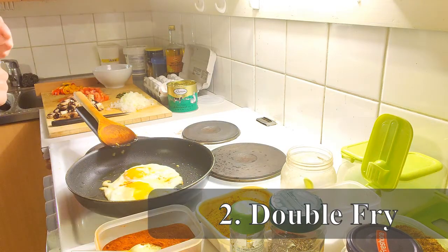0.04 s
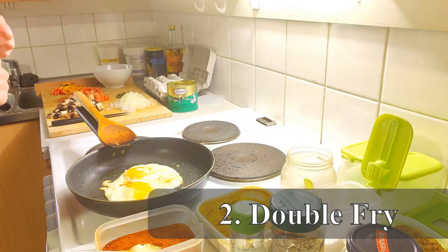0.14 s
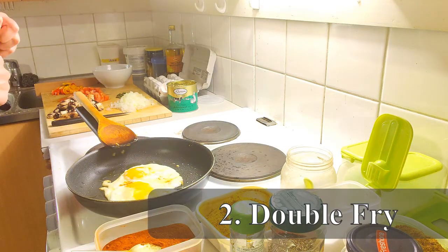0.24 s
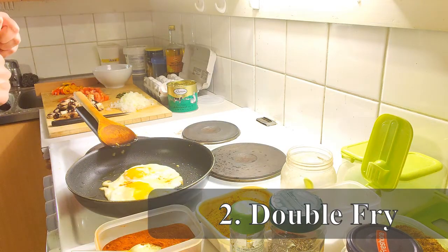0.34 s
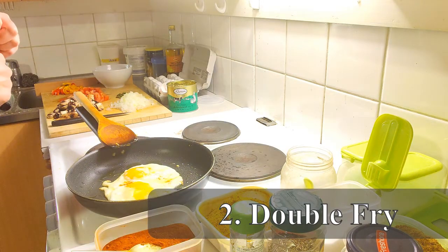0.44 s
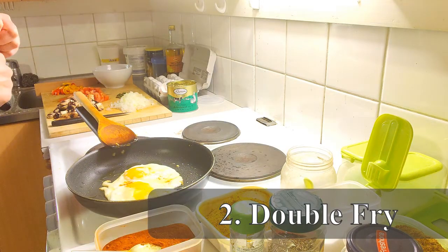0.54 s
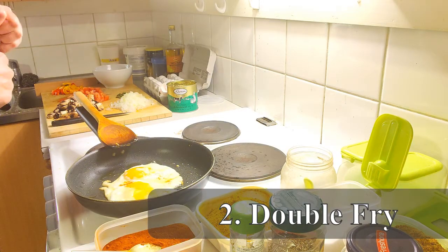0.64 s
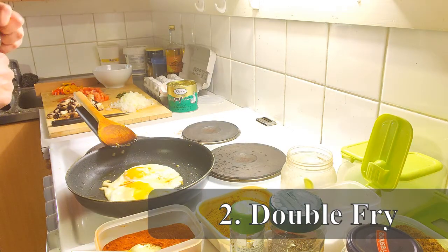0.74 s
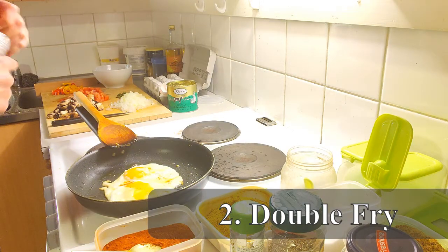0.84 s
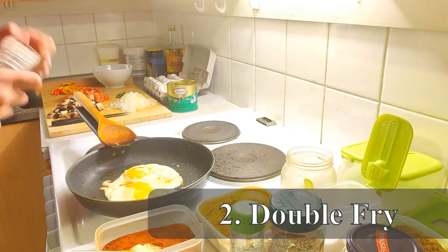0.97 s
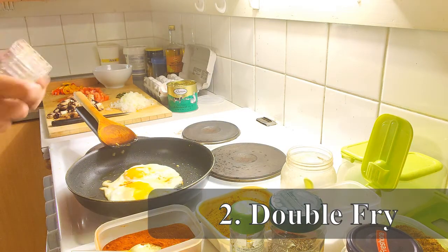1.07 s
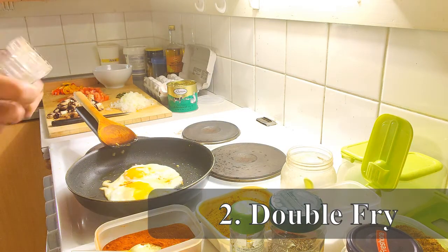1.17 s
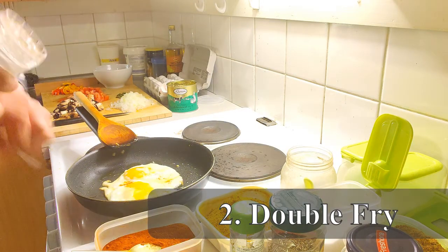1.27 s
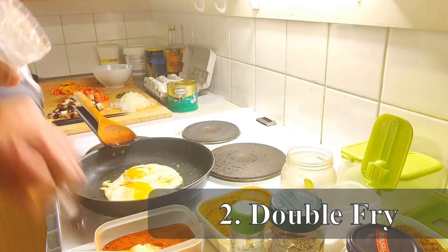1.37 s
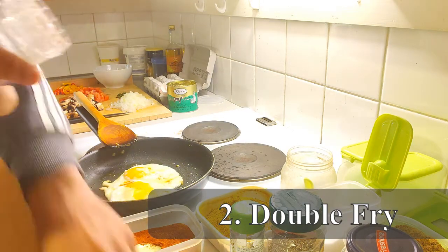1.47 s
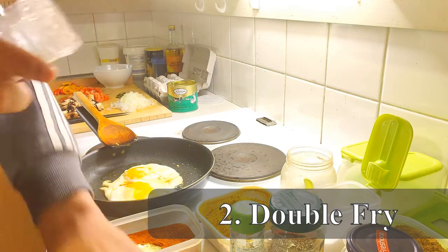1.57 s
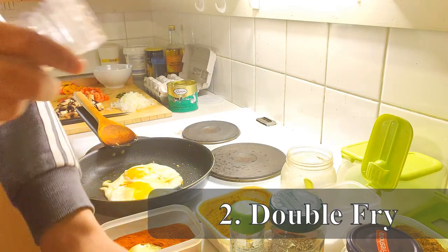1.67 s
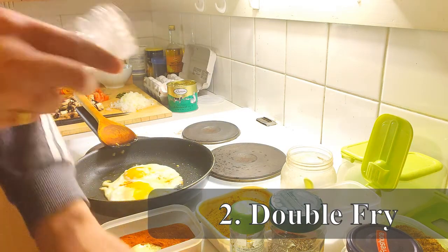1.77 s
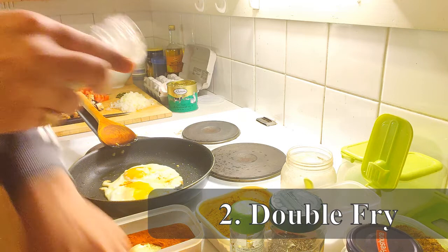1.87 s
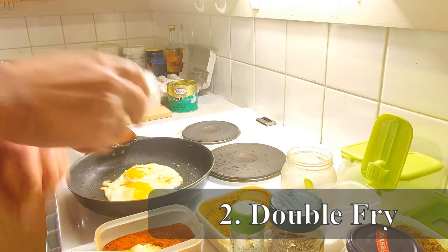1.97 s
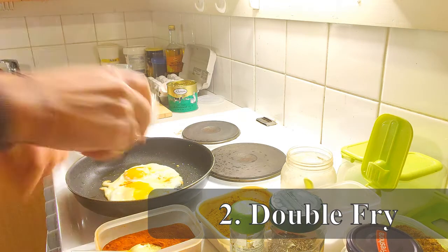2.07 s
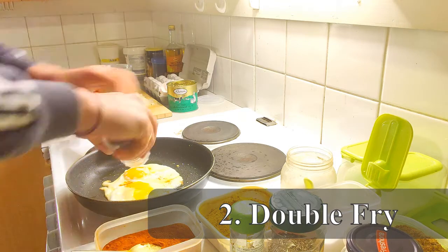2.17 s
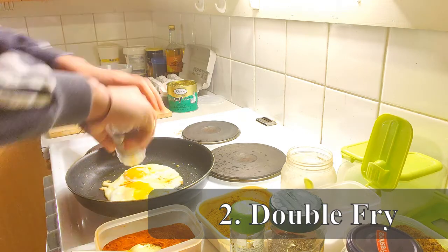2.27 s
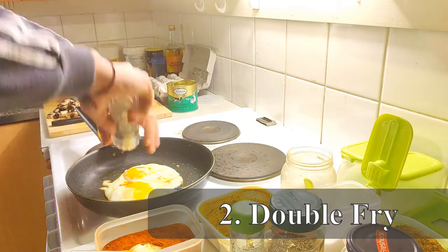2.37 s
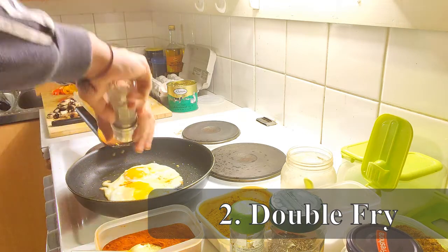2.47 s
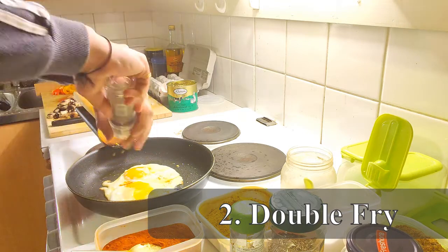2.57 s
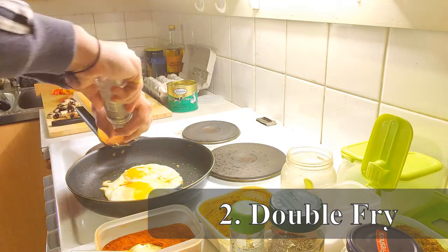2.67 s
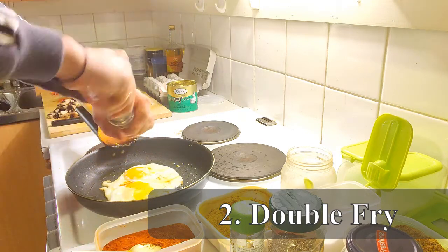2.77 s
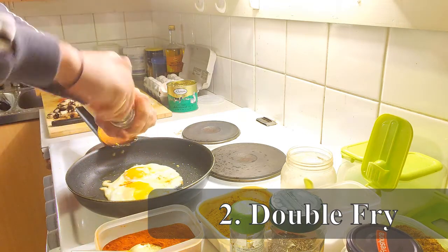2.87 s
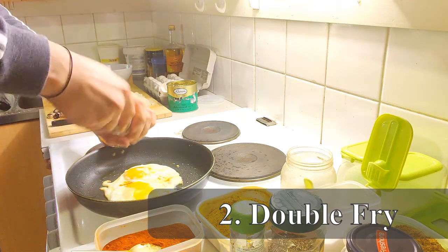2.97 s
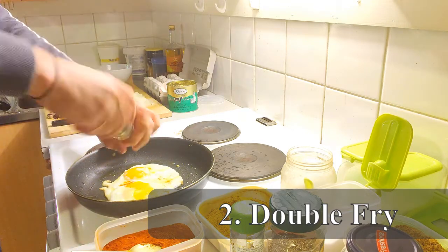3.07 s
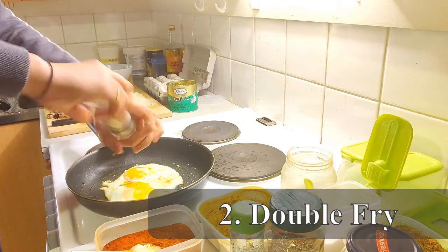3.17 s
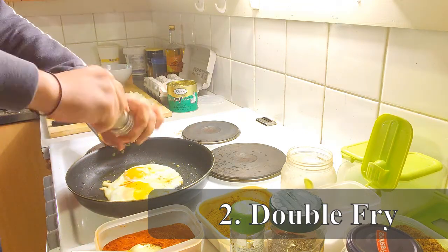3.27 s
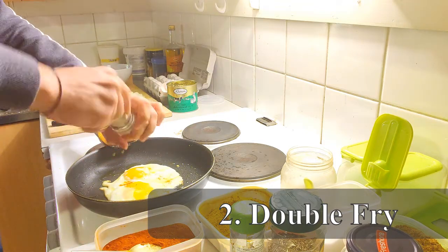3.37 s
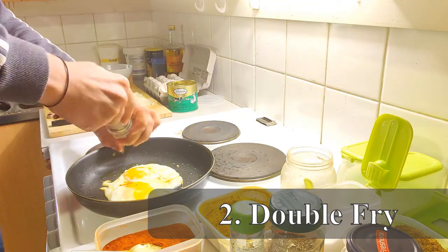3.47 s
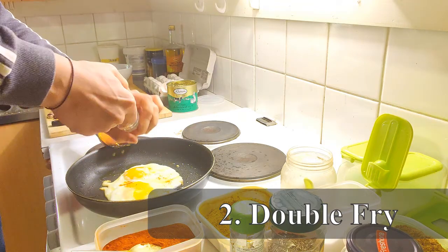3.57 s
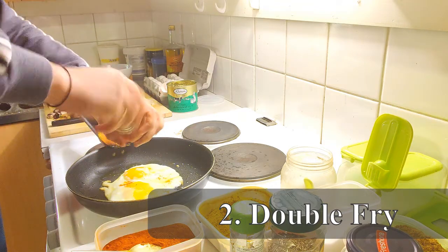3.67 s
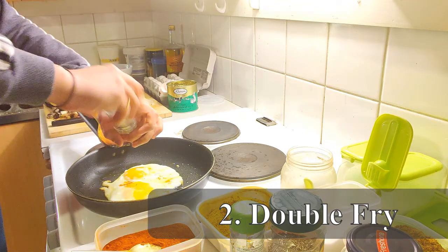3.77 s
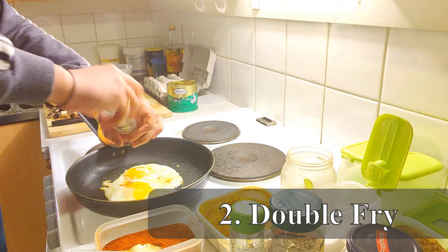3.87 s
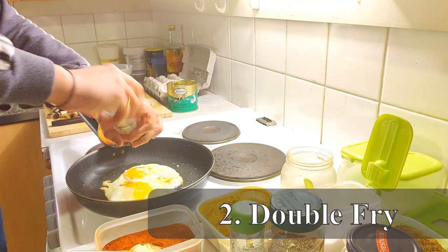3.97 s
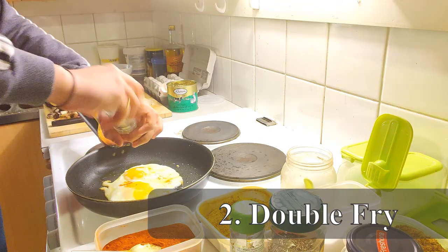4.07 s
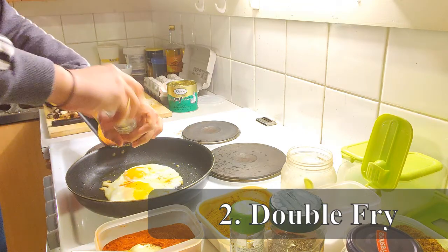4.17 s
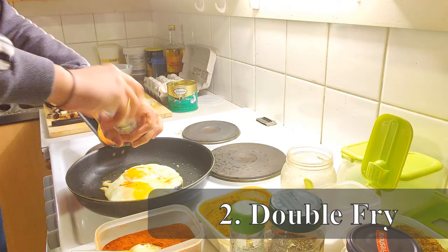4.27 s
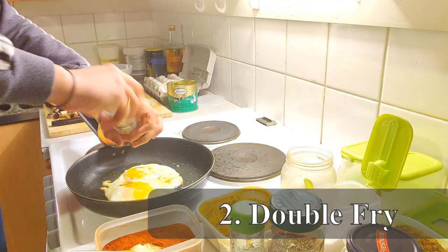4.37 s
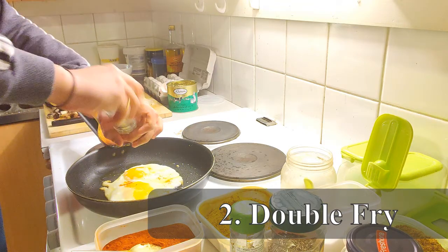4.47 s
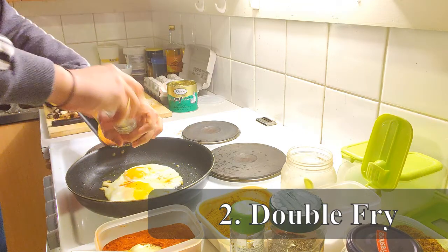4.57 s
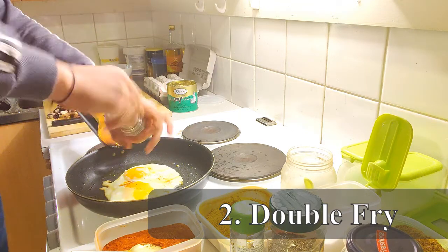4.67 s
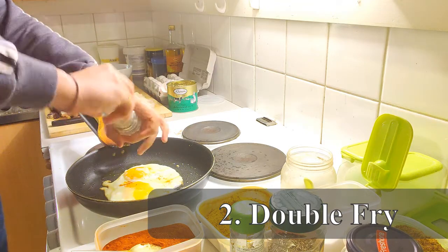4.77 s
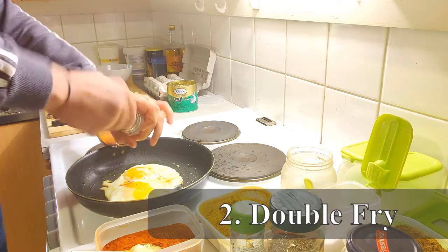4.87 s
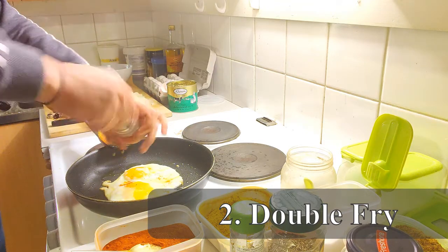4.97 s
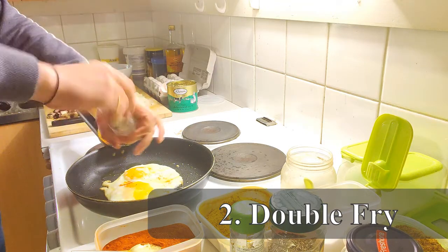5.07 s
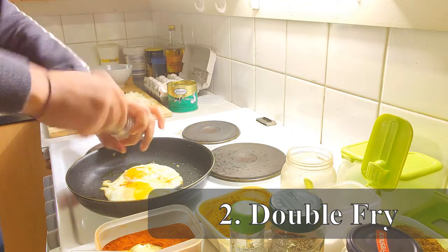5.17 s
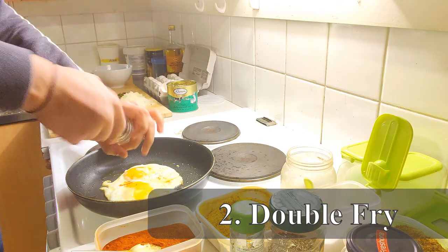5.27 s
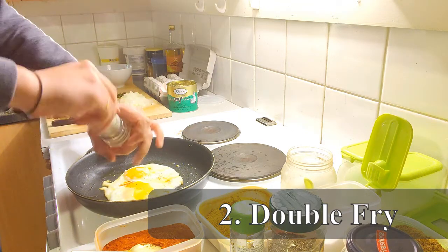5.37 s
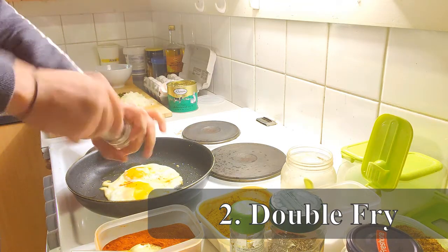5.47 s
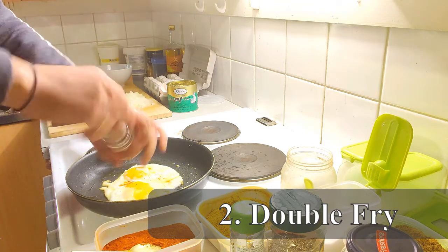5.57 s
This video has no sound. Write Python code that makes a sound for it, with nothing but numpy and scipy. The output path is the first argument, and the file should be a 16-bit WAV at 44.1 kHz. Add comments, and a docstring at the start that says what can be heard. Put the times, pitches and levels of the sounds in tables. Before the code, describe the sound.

Close stereo pickup beside a hob in a small, hard tiled kitchen. Faint frying hiss and low rumble run underneath. A cupboard door bumps lightly, then shuts with a hollow wooden boom and rattling catch. A plastic cap clicks off and scrapes, a hand rubs into its grip, and a pepper mill is twisted in short, crunchy bursts until the end, with quick room echoes.

```python
"""A low hum and a faint frying hiss fill a tiled kitchen while a cupboard door bumps, booms and rattles.
A plastic cap is pulled off a pepper mill and the mill is twisted over a pan, where an egg plops dully.
In each twist peppercorns snap and crumble between the burrs and ring the mill's small housing.
Blows are shaped noise plus fading tones, hiss and rumble are filtered noise, the hum is a sine wave.
The room answers every click with quick echoes and a fading tail."""
import sys
import numpy as np
from scipy import signal
from scipy.fft import rfft, irfft, next_fast_len
from scipy.io import wavfile
from scipy.ndimage import map_coordinates

SR = 44100
rng = np.random.default_rng(int(sys.argv[2]) if len(sys.argv) > 2 else 0)


def persist_wave(psi):
    """Save psi, clipped to +-1, as 16-bit WAV."""
    counts = np.round(np.clip(psi, -1, 1) * 32767).astype(np.int16)
    wavfile.write(sys.argv[1], SR, np.atleast_2d(counts).T)


N = 248634  # length in samples

# Tone colour of corn cracking in the burrs and housing. Each row: frequency in Hz, gain in dB.
MILL_COLOUR = [(120, -41), (270, -20), (450, -20.5), (860, -13), (1200, -17), (1700, -6), (2600, -9.5),
               (4200, -12.5), (5300, -10.5), (6900, -0.5), (8200, -12.5), (10200, -11), (12000, -14.5),
               (14200, -4.5), (16000, -9.5)]


def amp(db):
    """Turn decibels into gain."""
    return 10 ** (np.asarray(db) / 20)


def unit(x):
    """Scale a steady sound to an rms of 1."""
    return x / np.sqrt(np.mean(x ** 2) + 1e-20)


def pulse(x):
    """Scale a short sound to the energy of one millisecond at rms 1."""
    return x / np.sqrt(np.sum(x ** 2) * 1000 / SR + 1e-20)


def along(points, hz):
    """Read a curve of (Hz, value) points, with frequency on a log axis."""
    f, v = np.transpose(points)
    return np.interp(np.log(hz + 1), np.log(f + 1), v)


def ages():
    """Count the seconds that pass after a blow, for a third of a second."""
    return np.arange(SR // 3) / SR


def coloured(x, points):
    """Filter with the gains of (Hz, dB) points; like a real object, it only responds after the input."""
    m = next_fast_len(x.shape[-1] + 2048, True)
    gain_db = along(points, np.fft.rfftfreq(m, 1 / SR))
    # folding the cepstrum (the transform of the log gain) puts the response after each blow
    cepstrum = irfft(np.log(amp(gain_db)), m)
    cepstrum[1:m // 2] *= 2
    cepstrum[m // 2 + 1:] = 0
    response = np.exp(rfft(cepstrum))
    return irfft(rfft(x, m) * response, m)[..., :x.shape[-1]]


def diffuse(size):
    """Stereo noise whose left-right likeness is set per frequency: wide in the middle, mono in the top treble."""
    # Each row: frequency in Hz, left-right likeness (1 is identical).
    likeness = [(60, 1), (130, 0.95), (290, 0.63), (640, 0.79), (1410, 0.13), (3100, 0.2), (6800, 0.53),
                (10000, 1), (15000, 1)]
    turn = np.arccos(np.clip(along(likeness, np.fft.rfftfreq(size, 1 / SR)), -1, 1)) / 2
    spectra = rfft(rng.standard_normal((2, size)))
    mid, side = irfft(spectra * [np.cos(turn), np.sin(turn)], size)
    return np.array([mid + side, mid - side])


def burst(rise, t60):
    """A contact made of many tiny slips: noise swells for rise s, then falls 60 dB in t60 s."""
    t = ages()
    swell = np.minimum(t / rise, 1) ** 2
    fade = amp(-60 * np.maximum(t - rise, 0) / t60)
    return pulse(rng.standard_normal(len(t)) * swell * fade)


def ring(modes, scatter_db):
    """A struck object's own tones die away, each started at a new strength every time."""
    t = ages()
    total = np.zeros(len(t))
    for hz, db, t60 in modes:
        fade = amp(db + scatter_db * rng.normal() - 60 * t / t60)
        total += fade * np.sin(2 * np.pi * hz * t) * rng.choice([-1, 1])
    return pulse(total)


def in_kitchen(x, near_db, far_db, pan_db=0, lag_spread_s=.000013):
    """Direct sound, quick echoes from hob and tiles, and the tail of the room."""
    # How long the tail lasts. Each row: frequency in Hz, time to fall 60 dB in seconds.
    tail_times = [(130, 0.23), (340, 0.55), (600, 0.57), (1400, 0.48), (3700, 0.35), (7000, 0.27),
                  (14000, 0.2)]
    # Left-right phase offset of the direct sound; a whole turn means in phase.
    # Each row: frequency in Hz, offset in radians.
    phase_offset = [(60, -1), (800, 1.01), (1500, 2), (2400, 3.5), (4700, 2 * np.pi), (16000, 2 * np.pi)]
    size = SR // 2
    hz, age, z = signal.stft(diffuse(size=size), SR, nperseg=256)
    fade = amp(-60 * age / along(tail_times, hz)[:, None])
    tail = signal.istft(z * fade, SR, nperseg=256)[1][:, :size]
    t = np.arange(size) / SR
    near = diffuse(size=size) * amp(-60 * t / 0.047) * (t > .003)
    far = tail * (1 - np.exp(-t / 0.0022))
    echoes = amp(near_db) * near / np.linalg.norm(near[0]) + amp(far_db) * far / np.linalg.norm(far[0])
    hz = np.fft.rfftfreq(size, 1 / SR)
    delay = 2 * np.pi * hz * .0004  # 0.4 ms on both sides
    # each sound gets its own small random left-right lag, which widens the treble
    offset = along(phase_offset, hz) + 2 * np.pi * hz * lag_spread_s * rng.normal()
    direct = irfft(np.exp(-1j * np.array([delay, delay + offset])), size) * (t < .05)
    balance = unit(amp([[pan_db / 2], [-pan_db / 2]]))  # positive leans left
    return signal.fftconvolve(x[None], balance * direct + echoes, axes=1)


def add(track, s, sound):
    """Mix a sound into the track at time s, in seconds."""
    room_left = track[:, max(round(s * SR), 0):][:, :sound.shape[1]]
    room_left += sound[:, :room_left.shape[1]]


def background():
    """A faint, flickering frying hiss over low rumble and hum: filtered noise and one 70 Hz sine."""
    # Tone colour of the frying and room hiss. Each row: frequency in Hz, gain in dB.
    air = [(150, -34), (250, -7.5), (429, -3), (607, 0.5), (710, -6.5), (802, 2.5), (1280, -5.5),
           (1450, -8), (2960, -12), (3650, -10.5), (7060, -5), (8700, -14.5), (12200, -12.5), (13800, -3),
           (16000, -5)]
    # Tone colour of the room rumble. Each row: frequency in Hz, gain in dB.
    rumble_colour = [(12, -27), (20, -12), (58, -2.5), (86, 1.5), (108, -2.5), (239, -25), (260, -18),
                     (340, -50.5), (570, -120)]
    # Loudness of the rumble over time. Each row: time in seconds, level in dB.
    drone = [(0, -72), (.24, -72), (.34, -55.5), (5.6, -58)]
    t = np.arange(N) / SR
    flutter = map_coordinates(rng.standard_normal(N // 1000 + 4), [t * 25])  # 25 random points a second
    hiss = unit(coloured(diffuse(size=N), air)) * amp(-54.5 + 1.46 * flutter)
    hum = amp(-14.0) * np.sin(2 * np.pi * 70 * t)
    rumble = unit(coloured(diffuse(size=N), rumble_colour)) + hum
    return hiss + rumble * amp(np.interp(t, *np.transpose(drone)))


def cupboard():
    """Bumps shove the wooden door and set it booming while its hinge and catch rattle."""
    # Wooden bumps. Each row: start in seconds, relative level in dB.
    thuds = [(0.014, -45.5), (0.046, -49), (0.095, -42.5), (0.12, -49.5), (0.533, -31.5), (0.553, -47),
             (0.6645, -14.5), (0.686, -22)]
    # Tones of the door. Each row: frequency in Hz, relative level in dB, time to fall 60 dB in seconds.
    door = [(127, -3, 0.045), (177, -7, 0.17), (275.3, -1, 0.27), (316, -15, 0.27), (354.7, -1, 0.17),
            (498, -14, 0.19), (1690, -26, .2), (2070, -25, 0.29)]
    # Tone colour of the wood. Each row: frequency in Hz, gain in dB.
    wood = [(25, -46), (45, -33), (95, -0.5), (150, 3.5), (220, -4.5), (330, 5), (520, -5.5), (800, -12),
            (1500, -32), (4000, -52), (12000, -77)]
    # Hinge and catch. Each row: start in seconds, relative level in dB, brightness in dB.
    rattles = [(0.0187, -35.5, 0.5), (0.099, -37, 2.5), (0.2053, -38.5, 3), (0.382, -26, 5.5),
               (0.4919, -35.5, -16), (0.5152, -41.5, -3), (0.5341, -34, -11), (0.6641, -21, 4),
               (0.6945, -20.5, 8), (0.7024, -34, 8)]
    # Tone colour of hinge and catch. Each row: frequency in Hz, gain in dB.
    catch = [(300, 2), (1000, -2), (2100, 6), (3000, 6.5), (3700, 0.5), (5400, 0.5), (6300, -2.5),
             (7500, -0.5), (10000, -14), (16000, -10.5)]
    out = np.zeros((2, N))
    shove = pulse(coloured(signal.unit_impulse(len(ages())), wood))
    for s, db in thuds:
        judder = pulse(coloured(burst(rise=.002, t60=.035), wood))
        boom = ring(door, scatter_db=1.5)
        thud = shove + amp(-7.5) * judder + amp(1.5) * boom
        add(out, s, amp(db + 4.5) * in_kitchen(pulse(thud), near_db=-9.0, far_db=-9))
    for s, db, bright_db in rattles:
        contact = coloured(burst(rise=0.00085, t60=0.016), catch)
        tick = pulse(coloured(contact, [(2500, 0), (9000, bright_db)]))
        add(out, s, amp(db - 1.5) * in_kitchen(tick, near_db=-4.0, far_db=-3.5, pan_db=6.5))
    return out


def plops():
    """Steam escapes from under the egg in short, dull plops: a puff of noise and one brief tone."""
    # Each row: start in seconds, relative level in dB, pitch in Hz.
    puffs = [(0.237, -50.5, 787), (1.018, -53, 654), (1.319, -51.5, 950), (1.536, -56, 834),
             (2.135, -48, 626), (2.72, -49.5, 610), (3.185, -48.5, 780)]
    # Tone colour of the pan. Each row: frequency in Hz, gain in dB.
    pan = [(150, -31), (480, 5.5), (900, 5.5), (1150, -2), (1450, -7.5), (2500, -18), (6000, -27),
           (16000, -23)]
    out = np.zeros((2, N))
    for s, db, hz in puffs:
        puff = pulse(coloured(burst(rise=0.0037, t60=0.064), pan))
        plop = puff + ring([(hz, 0, .03)], scatter_db=0)
        add(out, s, amp(db + 5.5) * in_kitchen(pulse(plop), near_db=4.5, far_db=-8.5))
    return out


def squeak(hz=3400):
    """One tiny, thin squeak: a noise burst squeezed into a narrow band of pitch."""
    out = np.zeros((2, N))
    narrow = [(hz - 500, -40), (hz - 80, 0), (hz + 80, 0), (hz + 500, -40)]
    thin = pulse(coloured(burst(rise=0.012, t60=0.093), narrow))
    add(out, 0.972, amp(-43) * in_kitchen(thin, near_db=3.5, far_db=-11))
    return out


def cap():
    """The plastic cap clicks free, rings, and scrapes over its rim; hard contacts ring more."""
    # Unlatching and scraping. Each row: start in seconds, relative level in dB, hollowness in dB.
    contacts = [(1.7926, -11.5, -6), (1.8852, -19.5, -4), (1.8932, -13.5, -3.5), (1.9009, -25.5, 13),
                (1.9112, -21, 11), (1.9224, -25, -5)]
    # Tone colour of the plastic. Each row: frequency in Hz, gain in dB.
    plastic = [(150, -51), (380, -2), (700, -9.5), (1080, -2.5), (1400, -12.5), (2100, -2.5), (2900, -9.5),
               (4500, 2.5), (5700, -20.5), (7150, 3.5), (8700, -22), (10500, -6.5), (12000, -15),
               (14000, -3), (16000, -11)]
    # Tones of the cap. Each row: frequency in Hz, relative level in dB, time to fall 60 dB in seconds.
    cap_tones = [(450, -9, 0.11), (1736, -12.5, 0.14), (3950, -14, .04), (4440, -9, .12), (4710, -3, 0.12),
                 (6980, -8.5, 0.2), (7380, -9.5, 0.16)]
    ring_db, ring_grows = -9, .6  # ring of the hardest contact in dB; dB more ring per dB of force
    out = np.zeros((2, N))
    hardest_db = np.max(contacts, axis=0)[1]
    for s, db, hollow_db in contacts:
        ringing = amp(ring_db + ring_grows * (db - hardest_db)) * ring(cap_tones, scatter_db=2)
        clack = pulse(coloured(burst(rise=0.00034, t60=0.024), plastic)) + ringing
        tilt = [(2200, hollow_db), (4000, 0)]
        heard = in_kitchen(pulse(coloured(clack, tilt)), near_db=-0.5, far_db=-5.5, pan_db=6.0)
        add(out, s, amp(db - 2.5) * heard)
    return out


def handling():
    """A palm slides into its grip as rubbing noise; later changes of grip knock the hollow jar."""
    # A palm sliding on the mill. Each row: time in seconds, relative level in dB.
    slide = [(2.309, -79), (2.354, -43.5), (2.52, -65)]
    # Tone colour of the rubbing skin. Each row: frequency in Hz, gain in dB.
    skin = [(1000, -36), (3000, -14), (5000, -6), (6700, 3.5), (9000, -12), (12000, -13), (14000, 5),
            (16000, -3.5)]
    # Changes of grip. Each row: start in seconds, relative level in dB, clack in dB, tick in dB.
    knocks = [(3.281, -23.5, -6, -7.5), (4.829, -33.5, -3, -4), (4.847, -25.5, -38, -26),
              (5.218, -32.5, -7, -4)]
    # Tones of the mill's jar. Each row: frequency in Hz, relative level in dB, time to fall 60 dB in seconds.
    jar = [(487, -18, 0.2), (655, -10, 0.058), (827, -15, .055), (912, 0.5, 0.035), (1324, -1, 0.038),
           (1466, -15, 0.039), (1730, -3, 0.09)]
    # Tone colour of the gripping hand. Each row: frequency in Hz, gain in dB.
    grip = [(100, -24), (270, -22.5), (900, -1.5), (1150, -14), (1700, 8.5), (3000, -3), (4000, -13.5),
            (6500, -6), (9000, -9.5), (15000, -10.5)]
    out = np.zeros((2, N))
    s, db = np.transpose(slide)
    t = np.arange(s[0], s[-1], 1 / SR)
    rub = unit(coloured(rng.laplace(size=len(t)), skin)) * amp(np.interp(t, s, db) - 4)
    add(out, s[0], in_kitchen(rub, near_db=-0.5, far_db=-2))
    usual_clack, usual_tick = np.mean(knocks, axis=0)[2:4]
    for s, db, clack_db, tick_db in knocks:
        contact = pulse(coloured(burst(rise=0.0011, t60=0.015), grip))
        knock = contact + amp(-3) * ring(jar, scatter_db=2)
        tilt = [(1050, 0), (2700, clack_db - usual_clack), (6000, tick_db - usual_tick)]
        heard = in_kitchen(pulse(coloured(knock, tilt)), near_db=0.5, far_db=-1.5)
        add(out, s, amp(db - 1.5) * heard)
    return out


def fracture(t60, peak_s=0.00415, swell=0.63):
    """Strain builds in ever stronger micro-cracks, peaks at the break and dies away."""
    t = ages() - peak_s
    # the build-up takes swell times as long as the dying away
    return rng.laplace(size=len(t)) * amp(-60 * np.maximum(t, -t / swell) / t60)


def snaps(burr_db=4.5):
    """Corns break within milliseconds and ring burrs and housing; small ones sound more of the housing."""
    # Each row: start in seconds, relative level in dB, sharp edge in dB, left over right in dB.
    corns = [(2.8563, -26, -29, 8), (2.8923, -32.5, -7, 6), (2.9295, -13, -15.5, 4), (2.9453, -17, -28, 2),
             (2.9985, -14, -10.5, 3.5), (3.0214, -12, -14, 3), (3.0844, -17, -27, -2),
             (3.3668, -24.5, -9, 8), (3.4056, -15.5, -17.5, 12), (3.6087, -10.5, -11.5, -4),
             (3.6391, -19.5, -19, -5), (3.6712, -9, -16, 1.5), (3.71, -19, -34, 1), (4.0008, -21, -12, -5),
             (4.0091, -19, -8, 6), (4.0347, -22, -6, -5), (4.0685, -20, -14, 2), (4.365, -24, -11, 1),
             (4.3786, -16, -13, 7), (4.4074, -14.5, -13, 2), (4.587, -28, -5, 1.5),
             (4.6858, -22.5, -12, -2), (4.7225, -15, -7, 1.5), (4.9718, -29, -2, 10),
             (5.014, -11.5, -4.5, 5), (5.0292, -17.5, -8, 12), (5.2795, -26.5, -2, 1),
             (5.3202, -13, -11, 1), (5.355, -15, -12, 4), (5.3654, -11.5, -23.5, 0),
             (5.5784, -18.5, -30, 3)]
    # Tones of the housing. Each row: frequency in Hz, relative level in dB, time to fall 60 dB in seconds.
    housing_tones = [(1690, -20, 0.045), (4595, -9.5, 0.018), (5310, -8.5, 0.011), (6230, -14, 0.0089),
                     (6710, -10, 0.01)]
    edge_share = .9  # how far the sharp edge lifts the treble
    housing_db, housing_falls = 0.5, 0.61  # low end in dB; it lags this many dB per dB of a harder snap
    usual_burr_hz, burr_scatter = 6430, 0.08  # burr resonance; its share of change from corn to corn
    out = np.zeros((2, N))
    usual_db, usual_edge = np.mean(corns, axis=0)[1:3]
    for s, db, edge_db, pan_db in corns:
        crack = pulse(coloured(fracture(t60=.01), MILL_COLOUR))
        housing = pulse(signal.fftconvolve(crack, ring(housing_tones, scatter_db=8))[:len(crack)])
        low_db = housing_db - housing_falls * (db - usual_db)
        tilt = [(2200, low_db), (5000, 0), (8000, 0), (13000, edge_share * (edge_db - usual_edge))]
        burr_hz = usual_burr_hz * np.exp(burr_scatter * rng.normal())
        burr = [(.85 * burr_hz, 0), (burr_hz, burr_db), (1.15 * burr_hz, 0)]
        snap = pulse(coloured(coloured(crack + amp(-9.5) * housing, tilt), burr))
        heard = in_kitchen(snap, near_db=-5, far_db=-5, pan_db=pan_db)
        add(out, s - .003, amp(db - 2.5) * heard)  # begins early, as the strain builds before the break
    return out


def crumbling(rate=700, spread_db=4.0):
    """While the burrs turn, fragments are crushed in a dense patter of tiny cracks, about rate a second."""
    # Twists of the wrist. Each row: start in seconds, length in seconds, relative level in dB.
    twists = [(2.929, 0.11, -46.5), (3.37, 0.027, -42.5), (3.608, 0.15, -49.5), (4.003, 0.069, -39.5),
              (4.362, 0.039, -41.5), (4.666, 0.058, -44.5), (4.979, 0.057, -40.5), (5.29, 0.054, -38),
              (5.577, 0.051, -42)]
    # the burrs bite (dB per s), the pressure builds (dB), the wrist lets go (dB per s)
    bite, build, release = 904, 1, 220
    out = np.zeros((2, N))
    t = np.arange(-.05, .35, 1 / SR)
    for s, length, db in twists:
        sizes = amp(spread_db * np.minimum(rng.exponential(size=len(t)), 3)) * rng.choice([-1, 1], len(t))
        cracks = sizes * (rng.random(len(t)) < rate / SR)
        grains = unit(coloured(cracks, MILL_COLOUR))
        effort_db = bite * np.minimum(t, 0) + build * (np.clip(t / length, 0, 1) - .5)
        effort_db -= release * np.maximum(t - length, 0)
        add(out, s + t[0], in_kitchen(grains * amp(db + effort_db), near_db=-2, far_db=-1))
    return out


def scene():
    """Everything heard from beside the hob, added together."""
    kitchen = background() + cupboard() + plops() + squeak()
    mill = cap() + handling() + snaps() + crumbling()
    return kitchen + mill


def record(dry):
    """Keep nothing above the band limit: all higher frequencies are set to zero."""
    top_hz = 15950
    m = next_fast_len(N + SR // 2)
    return irfft(rfft(dry, m) * (np.fft.rfftfreq(m, 1 / SR) < top_hz), m)[:, :N]


dry = scene()
out = record(dry)
persist_wave(out)
```